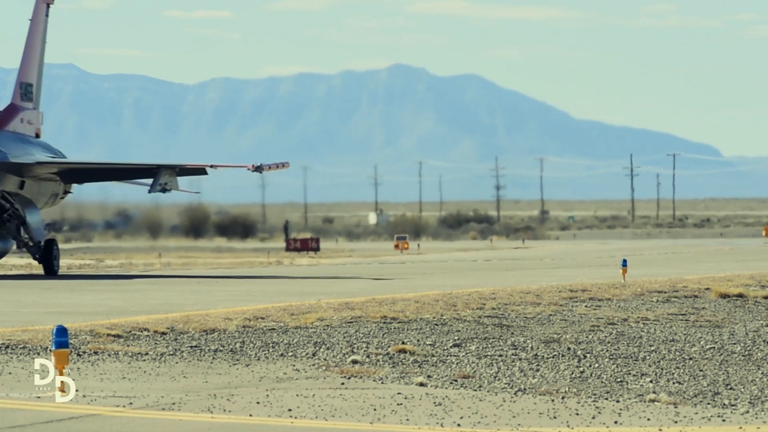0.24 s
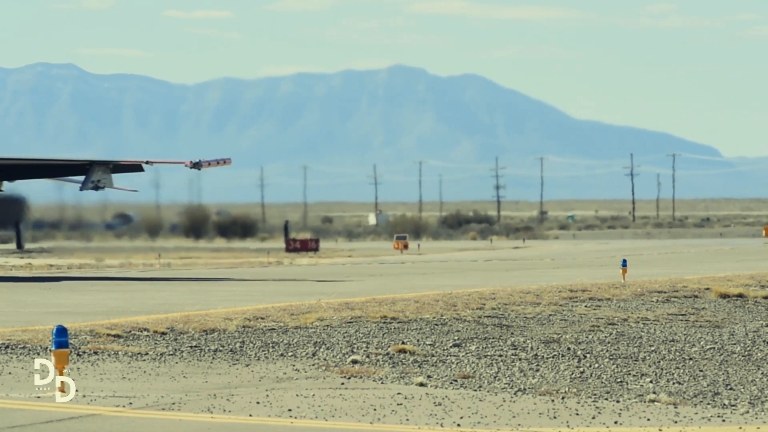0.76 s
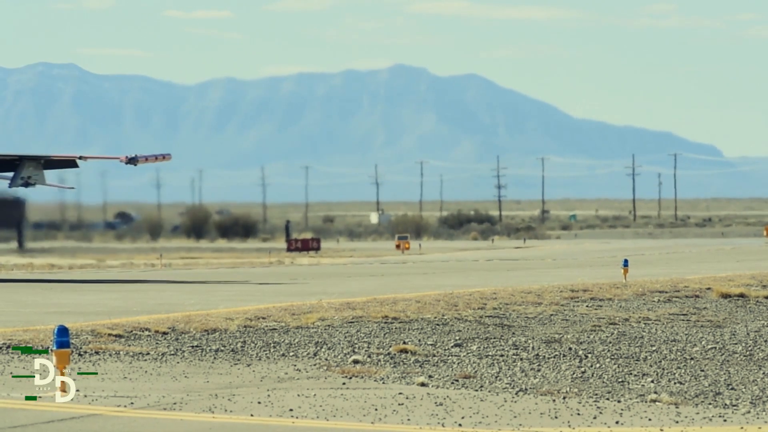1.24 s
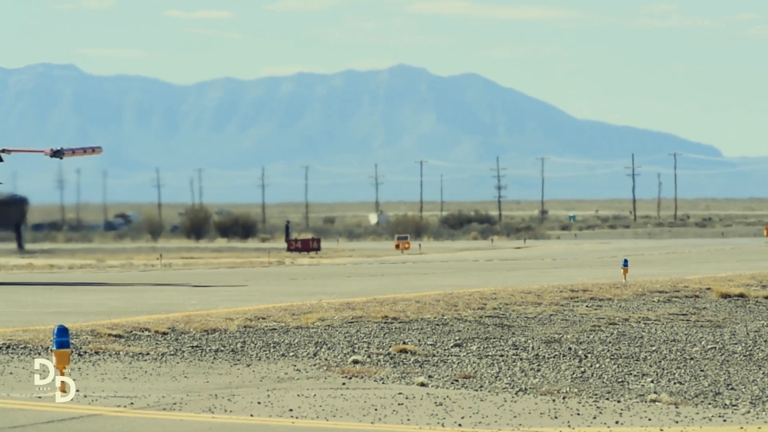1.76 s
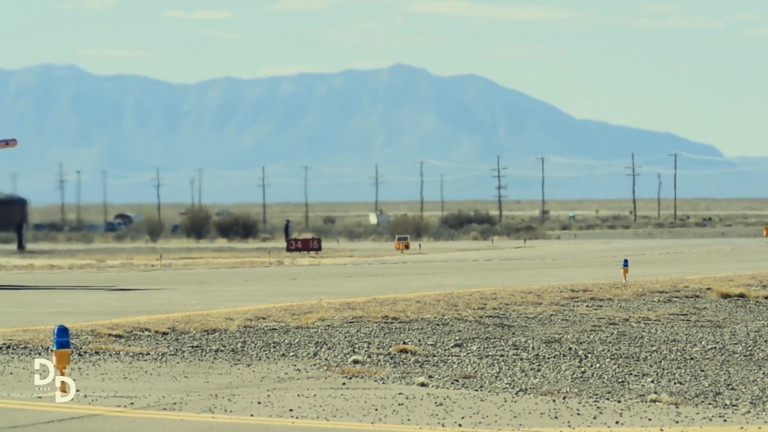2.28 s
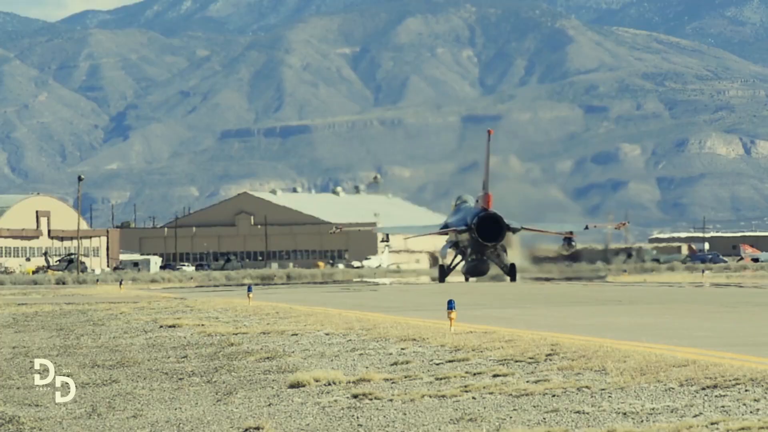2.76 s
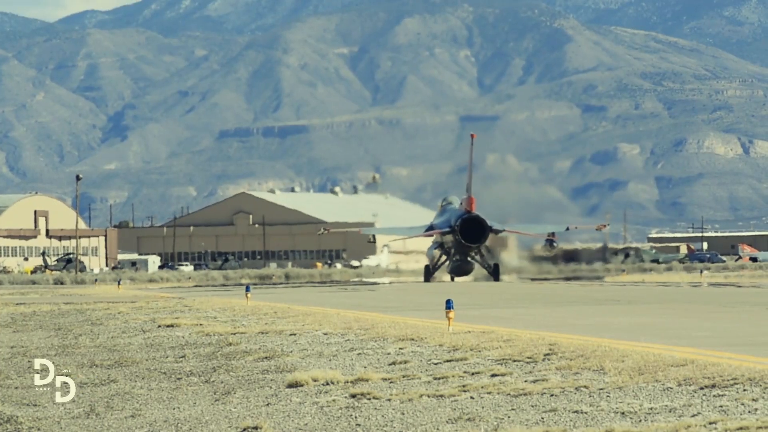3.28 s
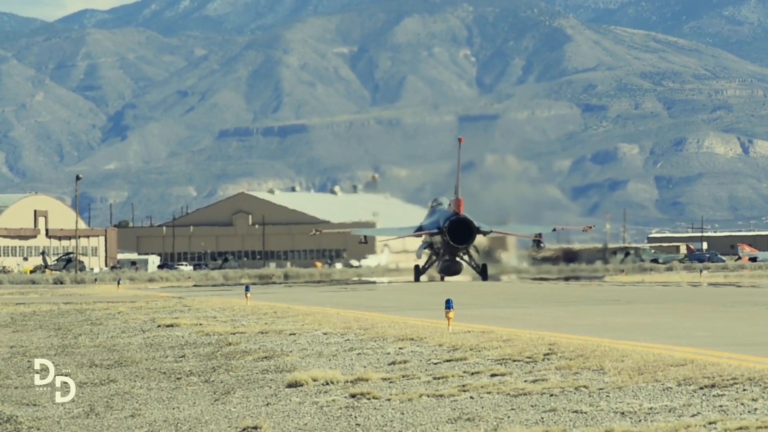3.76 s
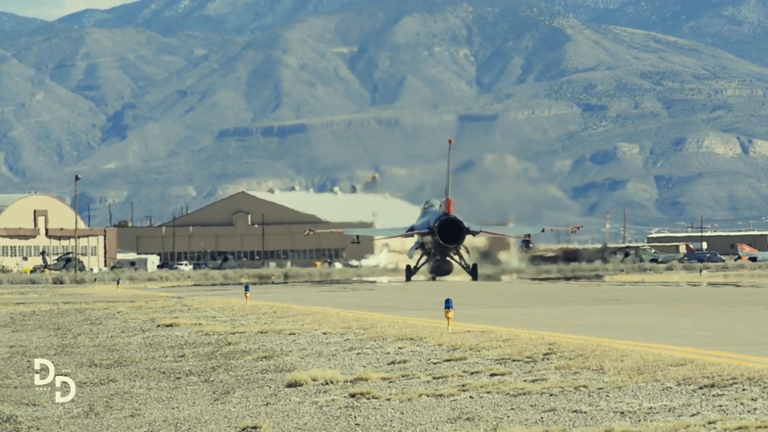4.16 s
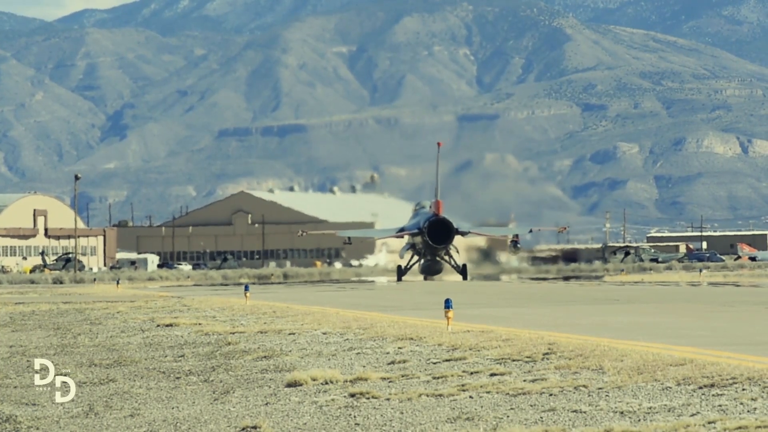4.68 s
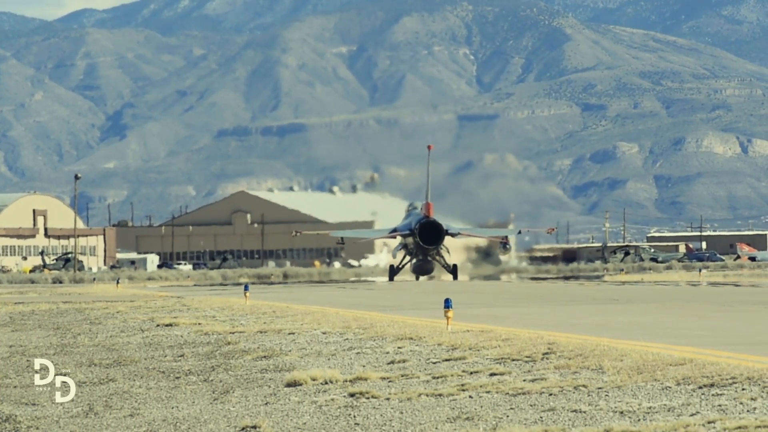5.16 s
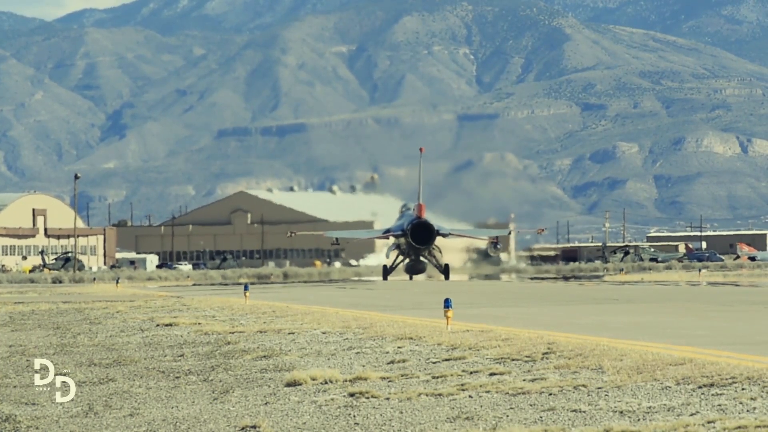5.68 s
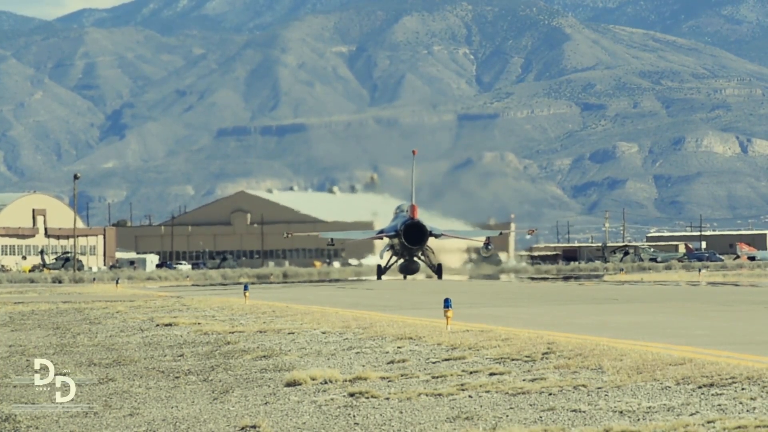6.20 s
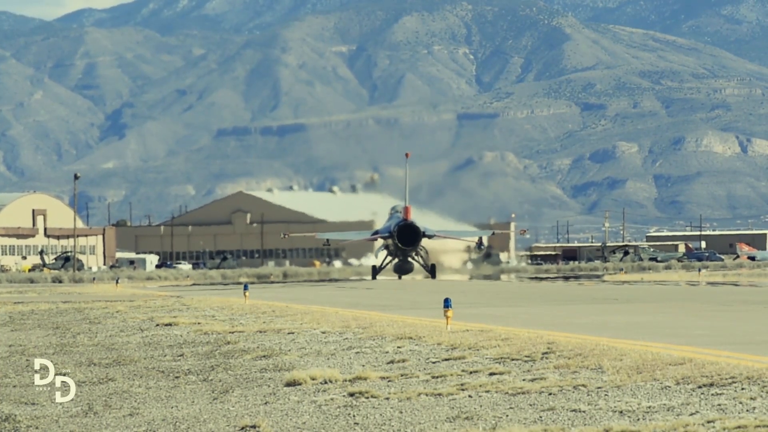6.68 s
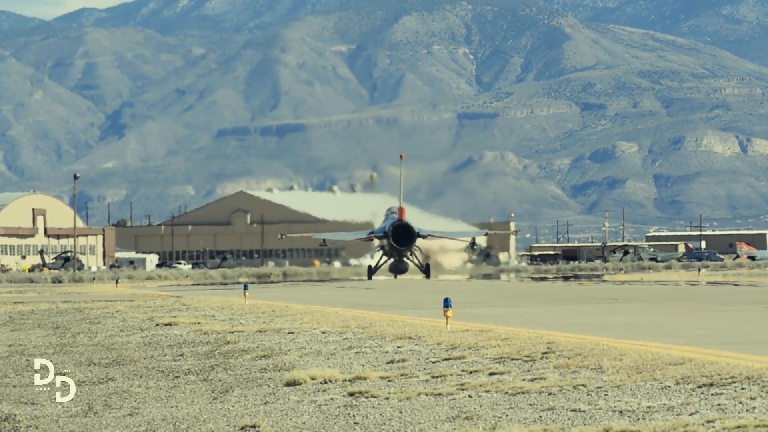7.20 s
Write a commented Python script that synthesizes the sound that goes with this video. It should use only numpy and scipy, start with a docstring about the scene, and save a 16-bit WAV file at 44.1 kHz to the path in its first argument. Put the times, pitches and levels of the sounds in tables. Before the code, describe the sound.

Outdoors on an open airfield, a jet fighter taxis close by with a loud, steady high whine, airy intake hiss and a noisy engine rush. The whine flutters and breaks up more as the tail turns. Just before three seconds it cuts abruptly to a distant jet: a faint dull roar, mostly masked by wind thumping and rumbling on the exposed microphone.

```python
"""A whining jet fighter taxis past at idle, with the hiss of its intake and the rush of its engine.
The sound then cuts abruptly to the jet far off and tail-on: a faint steady roar under thumping wind.
The whine is a tone with overtones, roughened by random flutter; hiss, rush and roar are coloured noise.
The wind is lumpy rumble, a crackle of small pushes, and single swings of pressure for strong eddies."""
import sys
import numpy as np
from scipy import signal
from scipy.fft import rfft, irfft, next_fast_len
from scipy.io import wavfile
from scipy.ndimage import uniform_filter1d, map_coordinates

SR = 44100
rng = np.random.default_rng(int(sys.argv[2]) if len(sys.argv) > 2 else 0)


def persist_wave(psi):
    """Save psi, clipped to +-1, as 16-bit WAV."""
    counts = np.round(np.clip(psi, -1, 1) * 32767).astype(np.int16)
    wavfile.write(sys.argv[1], SR, np.atleast_2d(counts).T)


N = 328104
CUT_S = 2.793  # when the near jet gives way to the far one


def amp(db):
    """Turn decibels into a gain."""
    return 10 ** (np.asarray(db) / 20)


def unit(x):
    """Scale to an average strength (rms) of 1."""
    return x / np.sqrt(np.mean(np.abs(x) ** 2) + 1e-20)


def clock():
    """The time of every sample, in seconds."""
    return np.arange(N) / SR


def along(points, hz):
    """Read a table of (pitch_hz, value) at any pitch, on a log scale of pitch."""
    f, v = np.transpose(points)
    return np.interp(np.log(np.abs(hz) + 1), np.log(f + 1), v)


def curves(rows):
    """Join the rows of a timed table by straight lines: one curve for each column after the time."""
    s, *cols = np.transpose(rows)
    return [np.interp(clock(), s, c) for c in cols]


def wobble(rate):
    """A smooth random curve through this many random points a second."""
    knots = rng.standard_normal(int(N * rate / SR) + 4)
    return map_coordinates(knots, [np.arange(N) * rate / SR])


def filtered(x, response):
    """Strengthen or weaken each pitch in x by the given response."""
    size = next_fast_len(N + 8192)  # padded, so that the end does not wrap onto the start
    return irfft(rfft(x, size) * response(np.fft.rfftfreq(size, 1 / SR)), size)[:N]


def noise(spectrum):
    """Noise of rms 1 with the given colour."""
    return unit(filtered(rng.standard_normal(N), lambda hz: amp(along(spectrum, hz))))


def complex_noise(response):
    """Complex noise of rms 1, spread alike below and above zero frequency."""
    real = filtered(rng.standard_normal(N), response)
    return unit(real + 1j * filtered(rng.standard_normal(N), response))


def patchy(x, depth_db):
    """Moving air lifts and sinks patches of pitch and time."""
    z = signal.stft(x, nperseg=1024)[2]
    across_pitch = uniform_filter1d(rng.standard_normal(z.shape), size=8, axis=0)
    field = uniform_filter1d(across_pitch, size=10, axis=1)
    return unit(signal.istft(z * amp(depth_db * unit(field)))[1][:N])


def even(x, seconds):
    """Keep the fast fluctuations of x, with a steady strength over longer times."""
    power = uniform_filter1d(np.abs(x) ** 2, size=int(seconds * SR))
    return x / np.sqrt(np.abs(power) + 1e-9)


def eddies(rate, scatter_db):
    """Random pushes and pulls of pressure, rate a second, of widely varying size."""
    struck = rng.random(N) < rate / SR
    sign = np.sign(rng.standard_normal(N))
    return struck * sign * amp(scatter_db * np.tanh(rng.standard_normal(N)))


# Colour of the wind's low rumble: pitch_hz, level_db per Hz (relative)
RUMBLE_COLOUR = [(12, -23), (25, -14), (40, 4), (70, 5.5), (110, 1.5), (150, -2.5), (220, -14), (400, -35),
                 (1500, -120)]
# Colour of the quicker flutter of small eddies: pitch_hz, level_db per Hz (relative)
FLUTTER_COLOUR = [(60, -67), (150, 1.5), (210, -0.5), (300, -4.5), (420, -9.5), (600, -27), (1000, -27),
                  (2500, -65), (6000, -120)]
# Gusts, and lulls where the rise is negative: middle_s, half_length_s, rumble_rise_db, flutter_rise_db
GUSTS = [(2.89, 0.067, -0.5, 5), (3.118, 0.26, 4.5, 10), (3.33, 0.017, -2, 1), (3.444, 0.11, 2.5, 10),
         (3.588, 0.026, -6, -11), (3.736, 0.16, 4.5, 8), (3.984, 0.076, 2, 3.5), (4.337, 0.023, 5.5, 11),
         (4.465, 0.086, 4, 10.5), (4.8, 0.19, 1, 6), (4.99, 0.015, -3, -5), (5.073, 0.059, 6.5, 2.5),
         (5.25, 0.15, 4, 5.5), (5.485, 0.016, -1, -2), (5.67, 0.15, 2, 12), (5.847, .015, 0, -6),
         (5.996, 0.076, 10, 12.5), (6.17, 0.049, 0, 8.5), (6.302, 0.18, 3, 10.5), (6.74, 0.028, -9, -3),
         (6.807, 0.033, 3, 9), (6.988, 0.034, 4, 6.5), (7.325, 0.028, 4, 7)]
RUMBLE_DB, FLUTTER_DB = -31.5, -42.5  # levels in the bare breeze
LUMP_DB = 4.8  # unevenness of the rumble, before its strength is steadied


def wind():
    """Each gust or lull shifts a lumpy rumble and a quicker flutter of small eddies."""
    t = clock()
    rumble_db, flutter_db = RUMBLE_DB, FLUTTER_DB
    for middle_s, half_length_s, rumble_rise_db, flutter_rise_db in GUSTS:
        gust = np.exp(-((t - middle_s) / half_length_s) ** 2)
        rumble_db = rumble_db + rumble_rise_db * gust
        flutter_db = flutter_db + flutter_rise_db * gust
    lumps = wobble(28)  # one packet of air carries both large and small eddies
    rumble = even(noise(RUMBLE_COLOUR) * amp(LUMP_DB * lumps), seconds=0.061)
    pushes = filtered(eddies(rate=130, scatter_db=4.5), lambda hz: amp(along(FLUTTER_COLOUR, hz)))
    flutter = even(unit(pushes) * amp(4.0 * lumps), seconds=0.09)
    return amp(rumble_db) * rumble + amp(flutter_db) * flutter


# The strongest eddies on the microphone: middle_s, swing_db, swing_hz, puff_db
# (both levels are set before the small trims and the soft start below)
THUMPS = [(2.86, -16.5, 115, -35), (2.876, -15.5, 90, -26), (2.89, -17, 159, -27), (2.95, -18, 204, -28),
          (2.991, -18.5, 90, -33), (3.026, -14, 204, -24), (3.112, -17, 115, -23), (3.151, -22, 90, -29),
          (3.245, -29, 168, -18.5), (3.31, -15.5, 135, -35), (3.377, -13.5, 171, -40),
          (3.394, -13, 253, -16.5), (3.443, -24, 147, -28), (3.481, -20, 188, -29), (3.496, -16, 125, -27),
          (3.536, -17, 90, -45), (3.654, -17, 159, -26), (3.679, -14, 149, -40), (3.745, -14.5, 98, -40),
          (3.759, -13.5, 147, -29), (3.789, -15, 146, -31), (3.822, -15.5, 235, -30),
          (4.056, -17, 162, -34), (4.413, -14.5, 219, -24), (4.464, -12, 90, -23.5), (4.49, -20, 115, -33),
          (4.503, -14, 89, -33), (4.572, -22.5, 174, -26), (4.708, -9, 252, -18.5), (4.721, -12, 90, -33),
          (4.766, -14, 134, -33), (4.807, -14.5, 125, -33), (4.824, -17, 204, -37),
          (4.884, -16.0, 173, -22), (5.195, -18, 90, -40), (5.246, -15.5, 135, -28),
          (5.565, -14.5, 90, -19), (5.616, -13, 105, -37), (5.641, -19.5, 242, -28), (5.707, -29, 200, -22),
          (5.728, -12.5, 221, -28), (5.807, -22, 185, -25), (5.875, -14, 147, -24),
          (5.975, -15.5, 115, -30), (6.006, -18, 125, -29), (6.022, -16, 106, -33),
          (6.087, -18.5, 159, -26), (6.163, -16, 148, -21), (6.212, -18.5, 187, -42),
          (6.244, -16.5, 98, -30), (6.265, -15, 159, -39), (6.333, -16, 98, -27), (6.347, -14, 173, -24),
          (6.367, -17.0, 172, -35), (6.497, -14.5, 126, -29), (6.65, -15.5, 98, -31),
          (6.799, -19.5, 180, -24), (6.849, -17.5, 155, -29), (6.992, -21, 171, -27),
          (7.338, -17.5, 145, -34), (7.398, -23, 201, -34)]
LEAD_S = .006  # from the start of an eddy to its middle
PUFF_HZ = 440  # the puff of a breaking eddy
EDGE_HZ, EDGE_DB = 1200, -18  # the puff's sharp edge, level against the puff


def thumps():
    """A strong eddy gives one swing of pressure, shorter for a smaller eddy, and a sharp puff as it breaks."""
    out = np.zeros(N + SR)
    t = np.arange(SR // 16) / SR
    from_middle = t - LEAD_S
    soft_start = 1 - np.exp(-t / 0.0027)

    def swing(hz, turn):
        """A single short burst of pressure; turn sets where in its cycle it stands."""
        return np.exp(-(hz * from_middle / 0.61) ** 2) * np.sin(2 * np.pi * hz * from_middle + turn)

    all_turns = rng.uniform(0, 2 * np.pi, (len(THUMPS), 2))
    for (middle_s, swing_db, hz, puff_db), (swing_turn, puff_turn) in zip(THUMPS, all_turns):
        puff = swing(PUFF_HZ, puff_turn) + amp(EDGE_DB) * swing(EDGE_HZ, puff_turn)
        push = amp(swing_db + 0.1) * swing(hz, swing_turn) + amp(puff_db - 1.3) * puff
        start = round((middle_s - LEAD_S) * SR)
        out[start:][:len(t)] += push * soft_start
    return out[:N]


# Colour of the distant roar: pitch_hz, level_db per Hz (relative)
ROAR_COLOUR = [(100, -9.5), (600, 0), (1000, -2.5), (1480, -5.5), (2050, -4), (3000, -12), (3800, -10.5),
               (4700, -15.5), (5500, -22), (6300, -18.5), (7300, -26.5), (9000, -28.5), (10800, -26),
               (13500, -33), (15000, -34)]
# Narrow resonances in the roar: pitch_hz, width_hz (narrowed by 0.8 below), level_db against the roar's colour
RESONANCES = [(631, 36, 1.5), (770.5, 45, 7.5), (937, 46, 6), (1117, 28, 5), (1311, 44, 8), (1633, 38, 2.5),
              (2035, 49, -1.5)]
ROAR_DB = -41.5
RESONANCE_SWELL_DB, RESONANCE_WANDER_HZ = 1.5, 7


def far_engine():
    """A dull steady roar of noise from the tailpipe; moving air makes its resonances swell and wander."""
    colour = lambda hz: amp(along(ROAR_COLOUR, hz))
    roar = filtered(rng.standard_normal(N), colour)
    for hz, width_hz, db in RESONANCES:
        ring = lambda f: amp(db) * colour(hz) / (1 + ((f - hz) / (.8 * width_hz)) ** 2)
        band = signal.hilbert(filtered(rng.standard_normal(N), ring), next_fast_len(N))[:N]
        drift = 2 * np.pi * np.cumsum(RESONANCE_WANDER_HZ * wobble(9)) / SR
        strength = unit(amp(RESONANCE_SWELL_DB * np.tanh(wobble(5))))
        roar = roar + strength * (band * np.exp(1j * drift)).real
    return amp(ROAR_DB + 0.17 * wobble(17.0)) * patchy(unit(roar), depth_db=1.0)


# The treble swelling and fading on the wind: time_s, level_db
TREBLE_LEVEL = [(0.06, -44.5), (0.2, -46), (0.5, -43.5), (0.62, -47), (0.8, -45.5), (.98, -47),
                (1.15, -50.5), (1.35, -46.5), (1.42, -42.5), (1.55, -45), (1.68, -47), (1.77, -51.5),
                (1.93, -46.5), (1.98, -43.5), (2.15, -41), (2.19, -39.5), (2.36, -38.5), (2.42, -39),
                (2.58, -44.5), (2.7, -41.5)]


def swell():
    """How far the treble stands above or below the average of its table (dB)."""
    return curves(TREBLE_LEVEL)[0] - np.mean(np.transpose(TREBLE_LEVEL)[1])


SHAFT_HZ = 40.2
THROB = .14  # size of the once-a-turn part, as a share of the level


def shaft_throb():
    """Slightly unequal blades make the sound throb once a turn of the shaft, and more weakly twice a turn."""
    turn = 2 * np.pi * SHAFT_HZ * clock()
    return 1 + THROB * (np.cos(turn) + np.cos(2 * turn) / 3)


def turned(middle_s, width_s):
    """A smooth change from 0 to 1 as the jet swings its tail towards the microphone."""
    return .5 + .5 * np.tanh((clock() - middle_s) / (2 * width_s))


# Spread of scattered sound about a tone: offset_hz (stretched by the spread below), level_db per Hz (relative)
SCATTER_SKIRT = [(1, 6), (6, -9), (14, -17.5), (28, 0.5), (41, -11), (58, -17.5), (100, -14), (200, -32.5),
                 (400, -45.5), (900, -100)]


def scattered(share, spread):
    """A tone heard through turbulence keeps a direct part and gains a fluttering part."""
    flutter = complex_noise(lambda hz: amp(along(SCATTER_SKIRT, hz / spread)))
    share = np.clip(share, 0, 1)
    return np.sqrt(1 - share ** 2) + share * flutter


# Shaft and gearbox tones: pitch_hz, level_db (relative, GEARS_DB is added below)
GEAR_TONES = [(361, -15.5), (430, -15), (667.5, -6.5), (733, -18.5), (870, -14), (918, -11), (970, -21),
              (1086, -20), (1165, -21), (1249, -17.5), (1332, -20), (1670, -7), (2232, -15)]
# Colours of the low drone, engine rush, intake hiss, fizz and the highest hiss:
# each is pitch_hz, level_db per Hz (relative)
DRONE_COLOUR = [(12, -30), (25, -20), (45, -7.5), (85, -4.5), (130, -0.5), (220, -1), (290, -9),
                (370, -6.5), (470, -9.5), (800, -33), (3000, -83.5)]
RUSH_COLOUR = [(150, -23), (330, -4.5), (420, -12.5), (475, -8), (570, -2), (710, -2), (830, -1.5),
               (980, 0), (1150, -3), (1450, -6), (2000, 1.5), (3500, -30.5), (9000, -88)]
HISS_COLOUR = [(900, -29), (1600, -4.5), (2300, 3), (2700, 1.5), (3100, -4.5), (3450, 1.5), (4000, -4),
               (4900, -17), (5400, -5), (6200, -32.5), (9000, -35), (15000, -57)]
FIZZ_COLOUR = [(2500, -26), (4300, 3), (5500, 0.5), (6400, -2.5), (7300, -4), (7900, -8), (9100, -6.5),
               (10300, -11.5), (12800, -15), (14000, -19), (15000, -29)]
SIZZLE_COLOUR = [(4000, -30.5), (8500, 2), (12500, -2), (15000, -7.5)]
TAILPIPE_S, TAILPIPE_WIDTH_S = 1.61, 0.093  # tailpipe comes into earshot: middle and time scale
# Levels side-on (dB), and their gain once the tailpipe is in earshot (dB)
RUSH_DB, RUSH_GAIN_DB = -36, 3
GEARS_DB, GEARS_GAIN_DB = -40, 6
# Levels at the treble's average (dB), and how far each follows its swell (dB per dB)
DRONE_DB, DRONE_SWELL = -40, 0.39
HISS_DB, HISS_SWELL = -36.5, 0.54
SIZZLE_DB, SIZZLE_SWELL = -61, 1.7  # comes through only at the top of a swell
DRONE_GAIN_DB = -1  # the drone's slow change up to the cut
FIZZ_DB = -0.5  # against the treble's level
ROTOR_HZ, RIPPLE_DB = 83.4, 3  # the rush gathers at multiples of a rotor's turning rate


def near_engine():
    """Noisy rush and gearbox tones grow as the tail swings round; the hiss swells and fades on the wind."""
    t = clock()
    tail = turned(TAILPIPE_S, TAILPIPE_WIDTH_S)
    gears = 0
    for hz, db in GEAR_TONES:
        gain = even(scattered(share=0.52, spread=0.4), seconds=0.25)
        waver = np.exp(2j * np.pi * np.cumsum(3.01 * wobble(10)) / SR)
        gears = gears + amp(db) * gain * waver * np.exp(2j * np.pi * hz * t)
    gears = amp(GEARS_DB + GEARS_GAIN_DB * tail) * gears.real

    drone_db = DRONE_DB + DRONE_GAIN_DB * t / CUT_S + DRONE_SWELL * swell()
    drone = amp(drone_db) * even(patchy(noise(DRONE_COLOUR), depth_db=4.5), seconds=0.098)

    # the ripple stops at the fan's pitch
    ripple = lambda hz: amp(RIPPLE_DB * np.cos(2 * np.pi * hz / ROTOR_HZ) * (hz < FAN_HZ))
    combed = filtered(noise(RUSH_COLOUR), ripple)
    rush = amp(RUSH_DB + RUSH_GAIN_DB * tail) * patchy(combed, depth_db=1.0)

    hiss = amp(HISS_DB + HISS_SWELL * swell()) * patchy(noise(HISS_COLOUR), depth_db=1.46)
    fizz_db = curves(TREBLE_LEVEL)[0] + FIZZ_DB + 0.59 * wobble(27)
    fizz = amp(fizz_db) * patchy(noise(FIZZ_COLOUR), depth_db=1.5)
    sizzle = amp(SIZZLE_DB + SIZZLE_SWELL * swell()) * noise(SIZZLE_COLOUR)
    return drone + rush + gears + (hiss + fizz + sizzle) * shaft_throb()


# Brief dropouts of the whine: middle_s, depth (0-1), half_length_s
DROPOUTS = [(0.048, 1, 0.0096), (0.123, 0.7, 0.012), (0.153, 0.4, 0.015), (0.286, 0.63, 0.012),
            (0.318, 0.72, 0.0075), (0.373, 1.0, 0.01), (0.497, 0.86, 0.008), (0.584, 1, 0.0088),
            (0.64, 0.45, 0.005), (1.112, 0.52, 0.019), (1.222, 0.72, 0.021), (1.297, 0.82, 0.022),
            (1.39, 0.6, 0.008), (1.5, 0.85, 0.007), (1.629, 1, 0.01), (1.649, 0.65, 0.015),
            (1.682, 0.4, 0.0096), (1.715, 1, 0.0092), (1.748, 0.9, 0.009), (1.785, 0.47, 0.027),
            (1.907, 0.6, 0.014), (1.94, 0.8, 0.0069), (1.989, 0.95, 0.004), (2.03, 1, 0.007),
            (2.049, 1, 0.013), (2.149, 0.6, 0.0036), (2.165, 0.7, 0.0055), (2.261, 0.93, 0.024),
            (2.322, 1, 0.012), (2.348, 1, 0.0071), (2.375, 1, 0.013), (2.417, 0.7, 0.028),
            (2.513, 1, 0.003), (2.535, 0.9, 0.0031), (2.57, 0.96, 0.01), (2.633, 1, 0.017),
            (2.659, 0.81, 0.016), (2.703, 0.95, 0.0064), (2.745, 1, 0.037), (2.778, 1, 0.003)]


def dropouts():
    """A second air path cancels the direct one for an instant, twisting the phase as it does."""
    t = clock()
    gain = np.ones(N, complex)
    ways = np.sign(rng.standard_normal(len(DROPOUTS)))  # which way the phase twists
    for (middle_s, depth, half_length_s), way in zip(DROPOUTS, ways):
        offset = (t - middle_s) / half_length_s
        gain = gain * (1 - min(depth, 1) * np.exp(-np.abs(offset) / 10) / (1 + 1j * way * offset))
    return gain


def fading(gain, ceiling):
    """Air paths cancel in deep brief dips, but add up only to a ceiling."""
    return gain / (1 + (np.abs(gain) / ceiling) ** 4) ** (1 / 4)


def breathy(width_hz, shift_hz):
    """A tone smeared into a soft band of noise, a little off its pitch."""
    skirt = lambda hz: 1 / np.sqrt(1 + (hz / width_hz) ** 2) / (1 + (hz / (6 * width_hz)) ** 2)
    return complex_noise(skirt) * np.exp(2j * np.pi * shift_hz * clock())


# Level of the whine: time_s, level_db (lifted by 1 dB below)
WHINE_LEVEL = [(0, -15), (.2, -15), (.42, -15.5), (.62, -15.5), (.69, -12.5), (.77, -15), (.84, -13),
               (.9, -16), (1.02, -13.5), (1.1, -14.5), (1.25, -12.5), (1.4, -17), (1.52, -17.5), (1.6, -13),
               (1.68, -18.5), (1.73, -12.5), (1.77, -19.5), (1.82, -19.5), (1.88, -14.5), (2.1, -17.5),
               (2.23, -17.5), (2.33, -18.5), (2.365, -12), (2.39, -19), (2.45, -19.5), (2.59, -16.5),
               (2.67, -20), (2.72, -13.5), (2.8, -20)]
# Level that all the overtones follow: time_s, level_db
OVERTONE_LEVEL = [(0, -42), (.3, -40.5), (.55, -42), (.78, -36.5), (.97, -40.5), (1.14, -44), (1.25, -43),
                  (1.32, -40.5), (1.58, -36.5), (1.66, -51.5), (1.8, -50), (1.93, -41.5), (2.04, -45),
                  (2.11, -37), (2.42, -37.5), (2.52, -42.5), (2.75, -39)]
# Fan overtones: multiple of the whine's pitch, level_db against the curve above
OVERTONES = [(2, 1), (3, -14), (4, -22.5), (5, -25), (6, -34.5), (7, -39), (8, -40.5)]
# Colour of a band of roar just under the second harmonic: pitch_hz, level_db per Hz (relative)
SHOULDER_COLOUR = [(3100, -40), (3380, -5), (3520, 3), (3750, -10), (4100, -41)]
SHOULDER_DB = -7.5  # against the overtones' curve, once the intake has turned away
FAN_HZ, SAG_HZ_PER_S = 1839, 2.5  # blade-passing tone, sagging slowly as the jet rolls by
WAVER_HZ, WAVER_TAIL_HZ = 3.13, 2.5  # random waver of the pitch, and its growth as the intake turns away
INTAKE_S, INTAKE_WIDTH_S = 2, 0.21  # intake turns away: middle and time scale
SCATTER_SIDE, SCATTER_TAIL = 0.23, 0.5  # share of the whine scattered by turbulence, side-on and tail-on
SCATTER_STAYS = .45  # share of the scattered sound that outlasts a dropout
BREATH_SIDE, BREATH_TAIL = .42, .93  # share of the overtones smeared into noise, side-on and tail-on
FLICKER_DB, TWIST = 4.8, .22  # turbulence flickers the overtones and twists their phase (radians per multiple)


def fan():
    """The blade-passing whine roughens as the intake turns away; its overtones flicker and turn breathy."""
    away = turned(INTAKE_S, INTAKE_WIDTH_S)
    pitch = FAN_HZ - SAG_HZ_PER_S * clock() + (WAVER_HZ + WAVER_TAIL_HZ * away) * wobble(14)
    phase = 2 * np.pi * np.cumsum(pitch) / SR
    share = SCATTER_SIDE + (SCATTER_TAIL - SCATTER_SIDE) * away
    breath = np.clip(BREATH_SIDE + (BREATH_TAIL - BREATH_SIDE) * away, 0, 1)
    (whine_db,), (overtone_db,) = curves(WHINE_LEVEL), curves(OVERTONE_LEVEL)

    dips = dropouts()
    flutter = even(scattered(share=1, spread=0.77), seconds=0.041)
    flutter = flutter * (SCATTER_STAYS + (1 - SCATTER_STAYS) * np.abs(dips))
    gain = fading(np.sqrt(1 - share ** 2) * dips + share * flutter, ceiling=1.5)
    tone = amp(whine_db + 1.0) * gain * np.exp(1j * phase)

    throb = shaft_throb()
    for multiple, db in OVERTONES:
        flicker = unit(amp(FLICKER_DB * np.tanh(wobble(26.2))))
        line = flicker * np.exp(1j * TWIST * multiple * wobble(30.02))
        band = breathy(width_hz=36 * multiple, shift_hz=-11 * multiple)
        gain = even(np.sqrt(1 - breath ** 2) * line + breath * band, seconds=0.26)
        tone = tone + amp(overtone_db + db) * gain * throb * np.exp(1j * round(multiple) * phase)
    shoulder = amp(overtone_db + SHOULDER_DB) * away * noise(SHOULDER_COLOUR)
    return np.sqrt(2) * tone.real + shoulder


def scene():
    """The near jet gives way at once to the far jet and the wind."""
    after = np.clip((clock() - CUT_S) / .002 + .5, 0, 1)  # a 2 ms crossfade
    near = fan() + near_engine()
    far = far_engine() + wind() + thumps()
    return ((1 - after) * near + after * far)[None]


TOP_HZ = 15100


def record(dry):
    """The recorder keeps nothing above its band limit."""
    return filtered(dry[0], lambda hz: hz < TOP_HZ)[None]


dry = scene()
out = record(dry)
persist_wave(out)
```